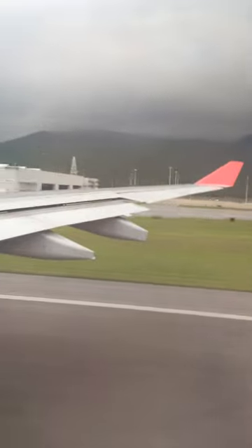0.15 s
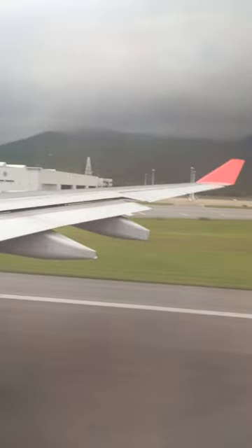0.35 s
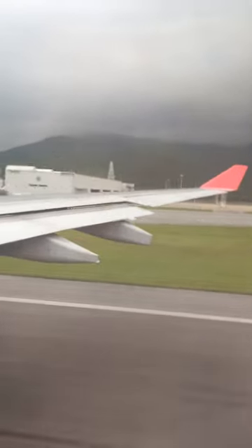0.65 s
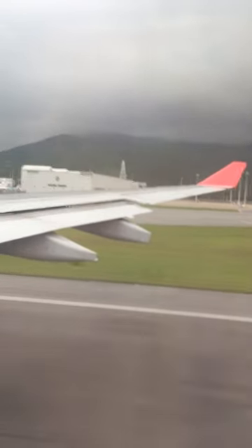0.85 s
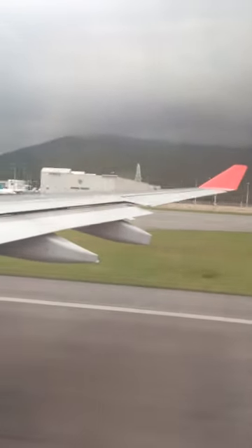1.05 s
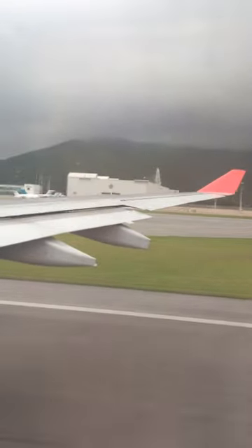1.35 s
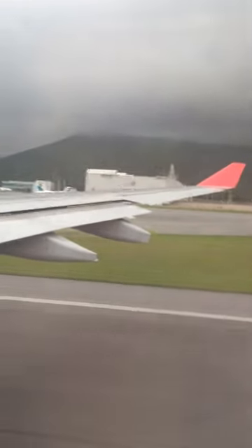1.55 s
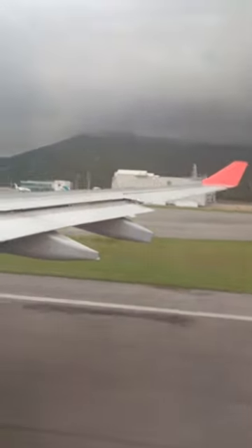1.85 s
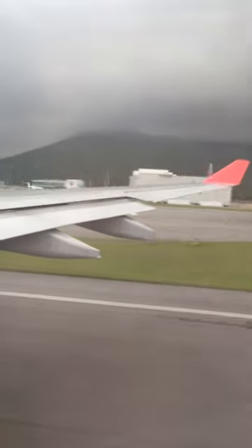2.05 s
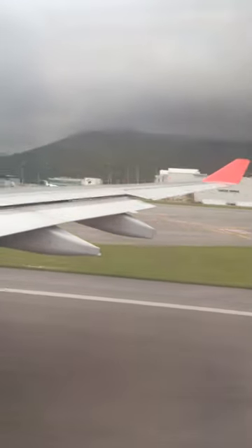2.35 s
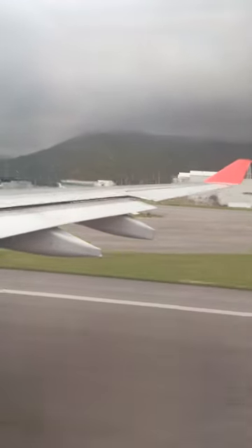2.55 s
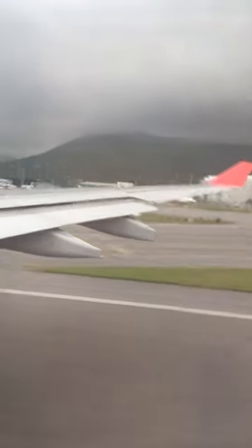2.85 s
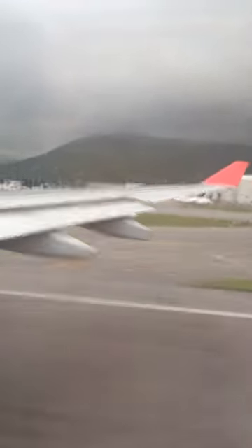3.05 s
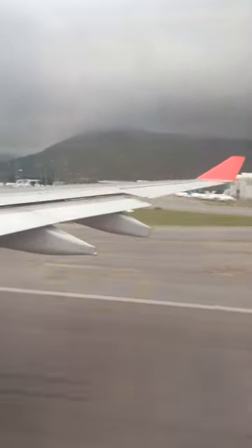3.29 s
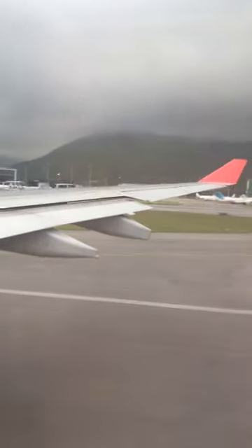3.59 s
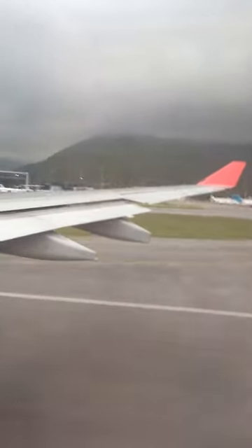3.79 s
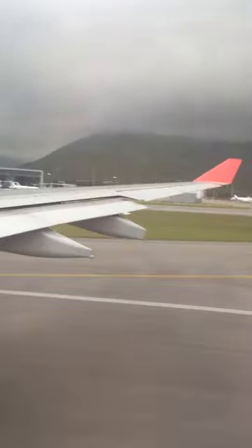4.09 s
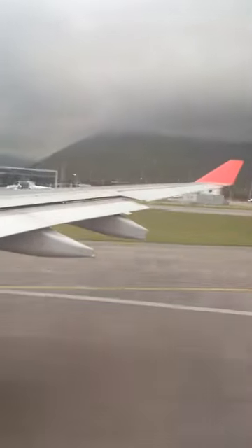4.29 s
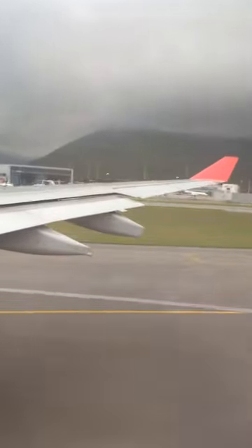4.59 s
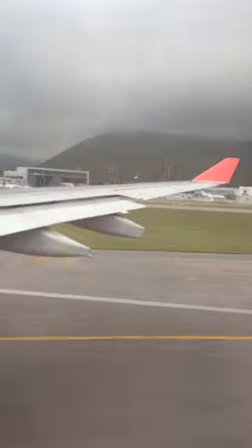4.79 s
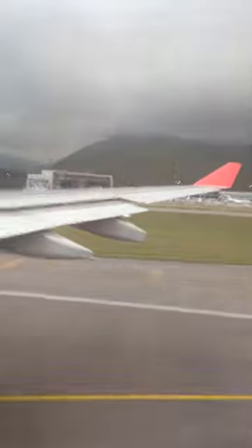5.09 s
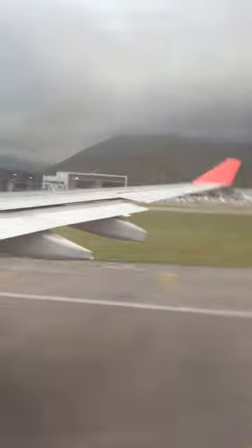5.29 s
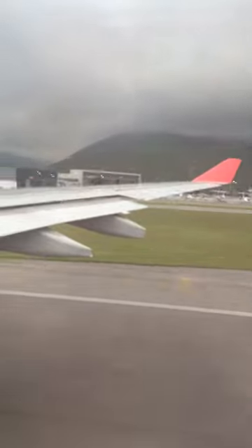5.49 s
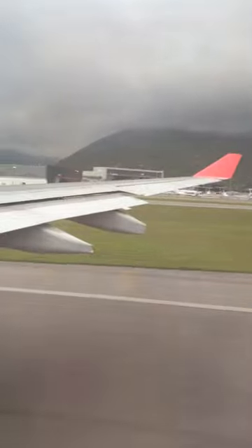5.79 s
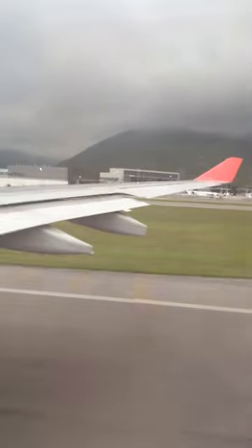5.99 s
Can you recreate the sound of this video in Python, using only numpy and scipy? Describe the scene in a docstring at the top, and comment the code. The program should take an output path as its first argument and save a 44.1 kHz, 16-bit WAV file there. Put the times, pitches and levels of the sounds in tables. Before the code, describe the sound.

Jet engines roar inside a plane speeding along the runway, with booming low rumble, soft air hiss and light rattling trim.

```python
"""A deep jet roar fills an airliner cabin on the takeoff roll, heard at a window seat behind the wing.
The jets roar through the fuselage and set the cabin air booming, air hisses along the skin,
and the wheels rumble; the low end swells and thumps now and then. The shaking makes a small loose
fitting sizzle in short fits and a plastic trim panel tick; rubbing plastic gives a few tiny squeaks.
A limiter holds the peaks."""
import sys
import numpy as np
from scipy import signal
from scipy.fft import rfft, irfft, next_fast_len
from scipy.io import wavfile
from scipy.ndimage import uniform_filter1d, minimum_filter1d, map_coordinates

SR = 44100
rng = np.random.default_rng(int(sys.argv[2]) if len(sys.argv) > 2 else 0)


def master_out(mix):
    """Clip the mix to full scale and print it as 16-bit PCM to the path in sys.argv[1]."""
    frames = np.transpose(np.atleast_2d(mix))
    ceiling = np.clip(frames, -1, 1)
    pcm = np.round(ceiling * 32767).astype(np.int16)
    wavfile.write(sys.argv[1], SR, pcm)


N = 270774


def amp(db):
    """Decibels to gain."""
    return 10 ** (np.asarray(db) / 20)


def unit(x):
    """Scale to rms 1."""
    return x / np.sqrt(np.mean(x ** 2) + 1e-20)


def fader(points):
    """A level in dB for every sample, ramping between (time_s, level_db) points."""
    time_s, level_db = np.transpose(points)
    return np.interp(np.arange(N) / SR, time_s, level_db)


def wobble(rate_hz):
    """A smooth curve through rate_hz random values a second."""
    knots = rng.standard_normal(int(N * rate_hz / SR) + 4)
    return map_coordinates(knots, [np.arange(N) * rate_hz / SR])


def filtered(x, response):
    """Shape x with a response, a gain for each frequency."""
    size = next_fast_len(N + SR // 2)
    return irfft(rfft(x, size) * response(np.fft.rfftfreq(size, 1 / SR)), size)[:N]


def lowpass(corner_hz, steepness):
    """A response that rolls off the highs, at half gain on the corner."""
    return lambda hz: 1 / (1 + (hz / corner_hz) ** steepness)


def colour(points):
    """An EQ curve through (freq_hz, gain_db) points on a log axis, silent beyond its ends."""
    freq_hz, gain_db = np.transpose(points)
    return lambda hz: amp(np.interp(np.log(hz + 1), np.log(freq_hz), gain_db, left=-120, right=-120))


def resonances(modes):
    """The ringing response of (pitch_hz, width_hz, gain_db) modes, alternating in polarity."""
    return lambda hz: sum(
        (-1) ** k * amp(db) * 1j * hz * width / (pitch ** 2 - hz ** 2 + 1j * hz * width)
        for k, (pitch, width, db) in enumerate(modes))


def noise(response):
    """Noise shaped by a response, at rms 1."""
    return unit(filtered(rng.standard_normal(N), response))


def steady(x):
    """Even out swells slower than a fifth of a second."""
    power = uniform_filter1d(uniform_filter1d(x * x, SR // 5), SR // 10)
    return x / np.sqrt(np.abs(power) + 1e-9)


def add(track, start_s, sound):
    """Mix a sound into a track."""
    part = track[max(round(start_s * SR), 0):][:len(sound)]
    part += sound[:len(part)]


# Tone of the exhaust through the fuselage: freq_hz, gain_db
JET_EQ = [(120, -39.5), (165, -6.5), (190, 0.5), (225, -1.5), (300, -3.5), (345, -10.5), (400, -18),
          (500, -23.5), (600, -23.5), (700, -29), (860, -30), (1050, -43), (1600, -64)]
# Fader ride on the body of the roar: time_s, level_db
LOWER_ROAR_RIDE = [(0.0, -19), (1.05, -17), (2.4, -17.5), (2.7, -22.5), (3.0, -18.5), (3.44, -19.5),
                   (3.59, -17), (3.74, -22), (3.89, -16), (4.19, -19.5), (4.34, -16.5), (4.49, -20.9),
                   (4.94, -20), (5.24, -20.5), (5.84, -20), (6.14, -19)]
# Fader ride on the upper part of the roar: time_s, level_db
UPPER_ROAR_RIDE = [(0.0, -35.5), (0.3, -40.5), (0.81, -36.8), (0.91, -40.5), (1.51, -36.5), (1.61, -38.5),
                   (2.52, -37.1), (3.02, -39.4), (3.12, -37), (3.72, -41), (3.93, -36), (4.13, -38),
                   (5.33, -40.5), (5.74, -38.5), (6.14, -39)]
# Narrow engine drones: pitch_hz, half_width_hz, level_db
ENGINE_DRONES = [(434.8, 24, -39), (778, 34, -48.5)]

def engines(split_hz=490):
    """Exhaust roar dulled by the fuselage, its two bands swelling separately, plus two drones."""
    tone, lower_share = colour(JET_EQ), lowpass(split_hz, 24)
    lower = steady(noise(lambda hz: tone(hz) * np.sqrt(lower_share(hz))))
    upper = steady(noise(lambda hz: tone(hz) * np.sqrt(1 - lower_share(hz))))
    drones = sum(amp(db) * noise(lambda hz: resonances([(pitch, 2 * half_width, 0)])(hz) ** 2)
                 for pitch, half_width, db in ENGINE_DRONES)
    return amp(fader(LOWER_ROAR_RIDE)) * lower + amp(fader(UPPER_ROAR_RIDE)) * upper + drones


# Resonances of the cabin air: pitch_hz, width_hz, gain_db
CABIN_MODES = [(124.5, 31, -1.5), (153.7, 27.3, -0.5)]
# Fader ride on the boom, before trim and throb: time_s, level_db
BOOM_RIDE = [(0, -17.5), (.25, -11), (.45, -20), (.75, -12), (2.2, -13), (3.3, -13.5), (3.87, -18),
             (4.05, -12.5), (4.55, -18), (5.25, -15), (6.14, -13)]

def cabin_boom(swell, trim_db=-0.73, wall_hz=260, throb_db=2.5):
    """The jets set the cabin air booming; it throbs and swells, and the wall stops the treble."""
    boom = noise(lambda hz: resonances(CABIN_MODES)(hz) * lowpass(wall_hz, 6)(hz))
    level_db = fader(BOOM_RIDE) + trim_db + throb_db * wobble(rate_hz=18)
    return (amp(level_db) + swell) * steady(boom)


# Tone of the tyre rumble: freq_hz, gain_db
RUMBLE_EQ = [(15, -30.5), (26, -17.5), (36, -6), (48, -12), (64, -0.5), (80, -1.5), (100, -0.5), (122, -8),
             (200, -48.5)]

def wheels(swell, rumble_db=-22.5):
    """The tyres shake the airframe through the landing gear; the rumble swells briefly at times."""
    return (amp(rumble_db) + swell) * steady(noise(colour(RUMBLE_EQ)))


# Tone of the air hiss: freq_hz, gain_db
HISS_EQ = [(500, -22.5), (900, 2), (1180, 4), (1290, 0.5), (1500, 1), (2400, -3.5), (3100, -8.5),
           (4500, -11.5), (6200, -15), (7500, -20), (9500, -27.5), (11300, -28.5), (12500, -34.5),
           (15500, -31.5)]
# Fader ride on the hiss, before trim and flutter: time_s, level_db
HISS_RIDE = [(0.0, -48.4), (0.15, -46), (0.3, -48.5), (0.6, -46.5), (1.2, -47.7), (1.5, -46), (1.65, -47),
             (2.1, -45.5), (2.7, -47), (3.59, -46.2), (3.74, -49.5), (3.89, -46), (4.34, -46.5),
             (4.49, -49), (4.94, -47), (5.39, -49), (5.69, -46), (6.14, -45.7)]

def airflow(trim_db=1.52, flutter_db=1.49):
    """Air rushes along the skin and flutters a little."""
    level_db = fader(HISS_RIDE) + trim_db + flutter_db * wobble(rate_hz=24)
    return amp(level_db) * noise(colour(HISS_EQ))


def contacts(bursts, hits_per_s, settle_db, ragged_db, rise_s):
    """Bursts of tiny impacts that build quickly and weaken unevenly as a loose part settles."""
    track = np.zeros(N)
    ragged = amp(ragged_db * wobble(rate_hz=110))
    for start_s, length_s, level_db in bursts:
        t = np.arange(int(2 * length_s * SR)) / SR
        progress = t / length_s
        hits = (rng.random(len(t)) < hits_per_s / SR) * rng.standard_normal(len(t))
        envelope = (1 - np.exp(-t / rise_s)) / (1 + progress ** 8)
        add(track, start_s, amp(level_db - settle_db * progress) * envelope * unit(hits))
    return track * unit(ragged)


# Fits of sizzling that drive the fitting: start_s, length_s, drive_db
SIZZLES = [(.055, 0.059, -52), (.28, .03, -54), (.835, .035, -55.5), (1.005, 0.053, -58),
           (1.38, 0.033, -55.5), (1.54, 0.017, -53), (2.255, 0.03, -53), (2.38, 0.11, -53.5),
           (2.665, .035, -53.5), (2.785, .045, -56), (3.37, .11, -52.5), (3.528, 0.095, -55),
           (3.71, 0.063, -53.5), (4.236, .04, -53), (4.345, 0.054, -52.5), (4.55, 0.16, -57),
           (4.83, .04, -53), (5.005, .03, -56), (5.12, 0.1, -55), (5.252, 0.037, -52), (5.393, .04, -54),
           (5.528, 0.044, -49.5), (5.685, 0.068, -50.5), (6.04, 0.067, -48)]
# Hard knocks that drive it: start_s, length_s, drive_db
HARD_KNOCKS = [(1.382, 0.0064, -45), (1.549, .007, -52), (3.217, 0.005, -36.5), (3.544, .008, -44),
               (4.238, 0.0089, -47)]
# Its bright ring: pitch_hz, width_hz, gain_db
FITTING_MODES = [(3380, 1100, -1.5), (4700, 210, 2.5), (5690, 310, 4), (6600, 240, -7), (8400, 320, -8),
                 (9900, 250, -8.5), (10500, 500, -13.5), (14800, 800, -13)]

def loose_fitting(sizzle_trim_db=1, knock_hz=11000):
    """A small loose part sizzles against its seat; a full knock has a longer contact and rings duller."""
    body = resonances(FITTING_MODES)
    body_rms = np.sqrt(np.mean(np.abs(body(np.linspace(0, SR / 2, SR // 20))) ** 2))
    sizzle = contacts(SIZZLES, hits_per_s=2600, settle_db=3.5, ragged_db=2, rise_s=0.0012)
    knocks = contacts(HARD_KNOCKS, hits_per_s=5000, settle_db=3, ragged_db=0.5, rise_s=0.0003)
    drive = amp(sizzle_trim_db) * sizzle + filtered(knocks, lowpass(knock_hz, 4))
    return filtered(drive, body) / body_rms


# Brief swells and thumps in the low rumble and cabin boom: peak_s, rumble_db, boom_db
LOW_SWELLS = [(.14, -22, -19), (0.561, -23, -11), (1.301, -22.5, -15), (2.54, -20.5, -16.5),
              (3.07, -23.5, -24), (4.04, -23, -13), (4.7, -25, -7.5), (4.984, -25, -11), (5.22, -33, -13),
              (5.85, -19, -29.5)]

def low_swells(rise_s=0.025, fall_s=0.034):
    """The rumble and the boom swell briefly and fall back; returns the added gain for each."""
    t = np.arange(N) / SR
    rumble_swell, boom_swell = np.zeros((2, N))
    for peak_s, rumble_db, boom_db in LOW_SWELLS:
        envelope = np.exp(-np.maximum((peak_s - t) / rise_s, (t - peak_s) / fall_s))
        rumble_swell += amp(rumble_db) * envelope
        boom_swell += amp(boom_db) * envelope
    return rumble_swell, boom_swell


# Short plastic ring of the trim panel: pitch_hz, gain_db, t60_s
PANEL_MODES = [(2240, -3.5, .02), (2446, 1.5, 0.037), (2710, -2, 0.039), (3150, -8.5, 0.039),
               (4320, -11, .012), (5940, -14, .012), (7400, -11, .013), (8320, -15.5, .013),
               (9700, -18.5, .014)]

def panel_tick(scatter_db, crack_db, crack_t60_s, attack_s=0.00096):
    """One contact of the trim panel: a short crack and its damped modes, peak 1."""
    t = np.arange(SR // 16) / SR
    pitch_hz, gain_db, t60_s = np.transpose(PANEL_MODES)[:, :, None]
    strength, detune, phase = rng.standard_normal((3, len(PANEL_MODES), 1))
    decays = amp(gain_db + scatter_db * strength - 60 * t / t60_s)
    cycles = pitch_hz * (1 + 0.0096 * detune) * t + phase
    ring = np.sum(decays * np.sin(2 * np.pi * cycles), axis=0)
    crack = amp(crack_db - 60 * t / crack_t60_s) * rng.standard_normal(len(t))
    tick = (ring + crack) * (1 - np.exp(-t / attack_s))
    return tick / np.abs(tick).max()


# Clear ticks of the panel: start_s, level_db
PANEL_TICKS = [(0.2838, -32), (0.2996, -38), (0.527, -30), (3.1376, -36), (3.671, -44), (4.889, -40),
               (5.1862, -37), (5.2819, -34.5), (5.3047, -32), (5.3282, -32), (5.447, -35.5), (5.4616, -38),
               (5.565, -35.5), (5.595, -34), (5.6087, -32), (5.67, -29), (5.7879, -36.5), (5.8688, -30.5),
               (5.8763, -32), (5.889, -29.5), (5.9057, -35)]

def trim_panel(chatter_db=-47, chatter_count=24, contact_hz=10000):
    """The shaken panel ticks, over faint chatter that grows denser as the aircraft gathers speed."""
    track = np.zeros(N)
    for start_s, level_db in PANEL_TICKS:
        add(track, start_s, amp(level_db) * panel_tick(scatter_db=1, crack_db=-1, crack_t60_s=0.016))
    for when, strength in rng.random((chatter_count, 2)):
        start_s = np.sqrt(when) * N / SR  # crowds toward the end
        tick = panel_tick(scatter_db=2, crack_db=-13.5, crack_t60_s=0.017)
        add(track, start_s, amp(chatter_db + 4 * strength) * tick)
    return filtered(track, lowpass(contact_hz, 12))  # soft plastic gives no top treble


# Tiny squeaks of rubbing plastic: start_s, pitch_hz, level_db
PLASTIC_SQUEAKS = [(2.15, 11300, -61), (4.49, 11400, -63), (4.885, 7360, -54), (5.99, 11400, -67),
                   (6.015, 11350, -59)]

def squeaks(length_s=0.022, waver=0.026):
    """Plastic sticks and slips for an instant on a wavering pitch."""
    track = np.zeros(N)
    envelope = np.hanning(int(length_s * SR))
    for start_s, pitch_hz, level_db in PLASTIC_SQUEAKS:
        wavering_hz = pitch_hz * (1 + waver * wobble(rate_hz=600)[:len(envelope)])
        tone = np.sin(2 * np.pi * np.cumsum(wavering_hz) / SR)
        add(track, start_s, amp(level_db) * envelope * tone)
    return track


def scene():
    """The mono mix at the window seat: a bed of roar with small rattles on top."""
    rumble_swell, boom_swell = low_swells()
    bed = wheels(rumble_swell) + cabin_boom(boom_swell) + engines() + airflow()
    rattles = trim_panel() + loose_fitting() + squeaks()
    return (bed + rattles)[None]


def record(dry, ceiling=0.71, top_hz=15250):
    """A look-ahead limiter holds the peaks, then a steep low-pass takes off the very top."""
    needed_gain = np.minimum(1, ceiling / (np.abs(dry[0]) + 1e-9))
    window = SR // 50  # 20 ms
    smooth_gain = uniform_filter1d(minimum_filter1d(needed_gain, window), window)
    high_cut = signal.butter(16, top_hz, fs=SR, output="sos")
    return signal.sosfiltfilt(high_cut, dry[0] * smooth_gain)[None]


dry = scene()
out = record(dry)
master_out(out)
```